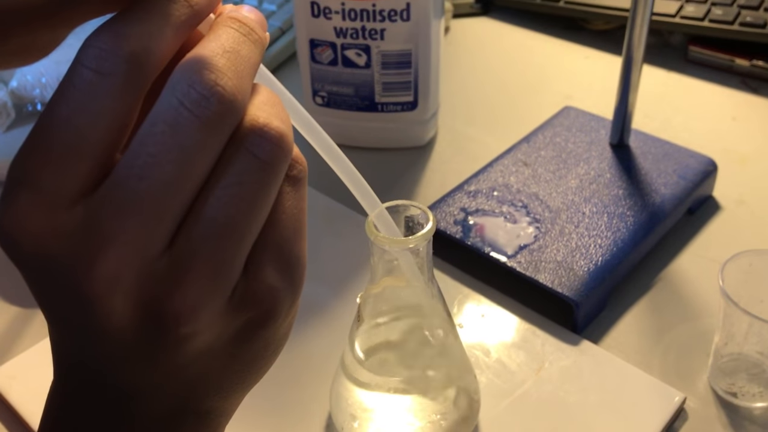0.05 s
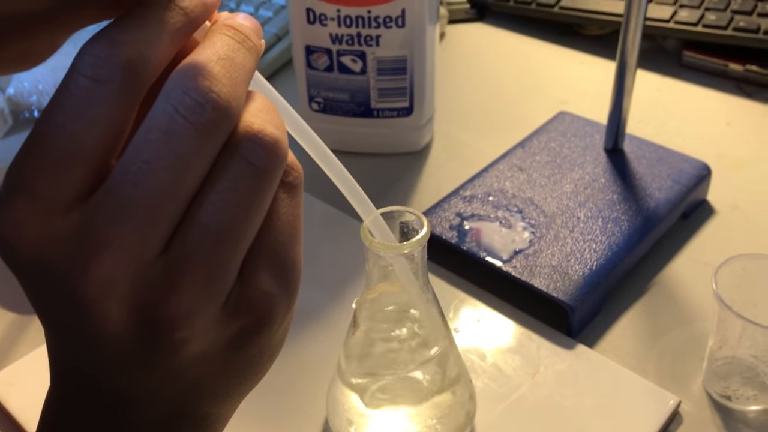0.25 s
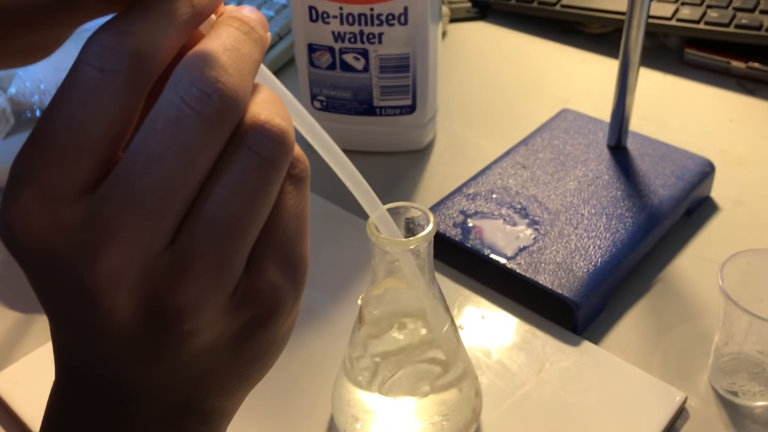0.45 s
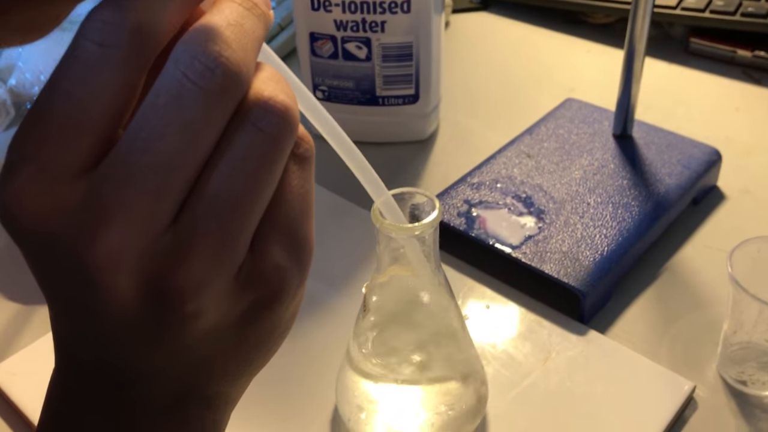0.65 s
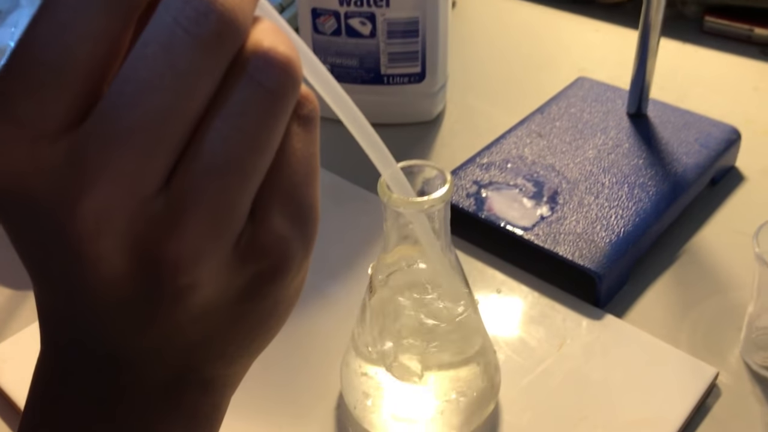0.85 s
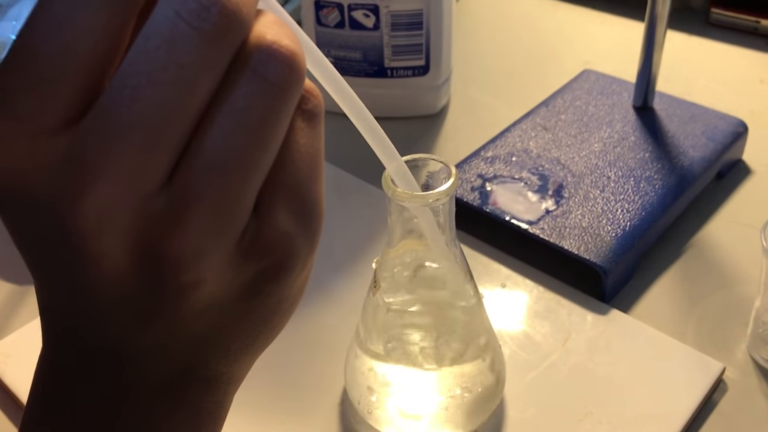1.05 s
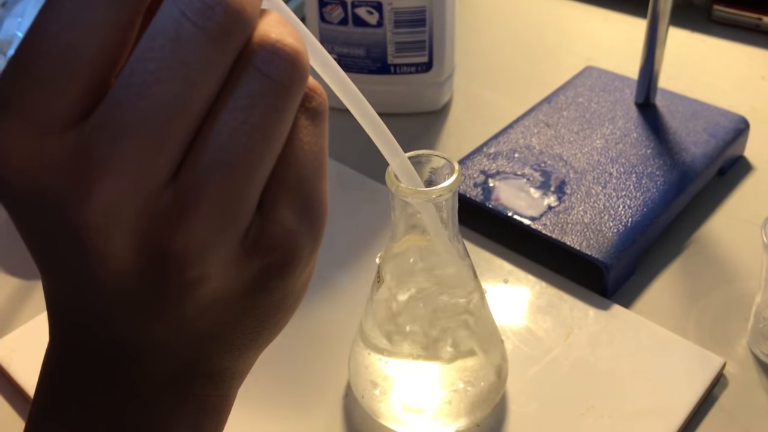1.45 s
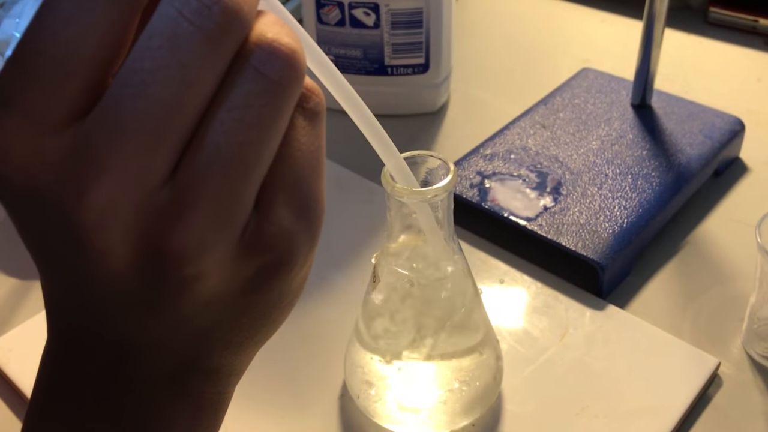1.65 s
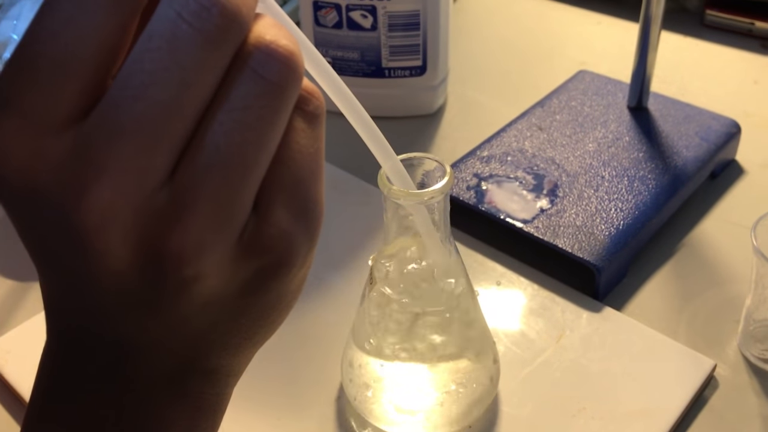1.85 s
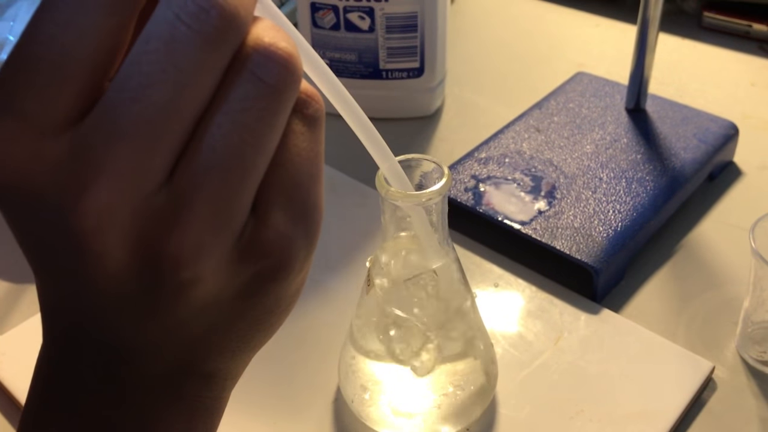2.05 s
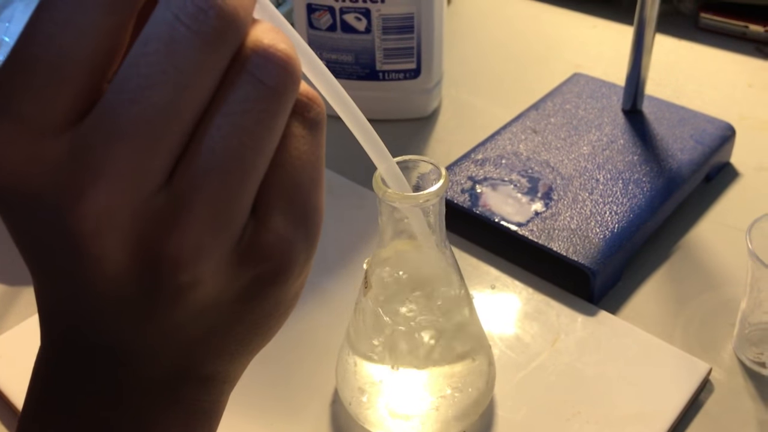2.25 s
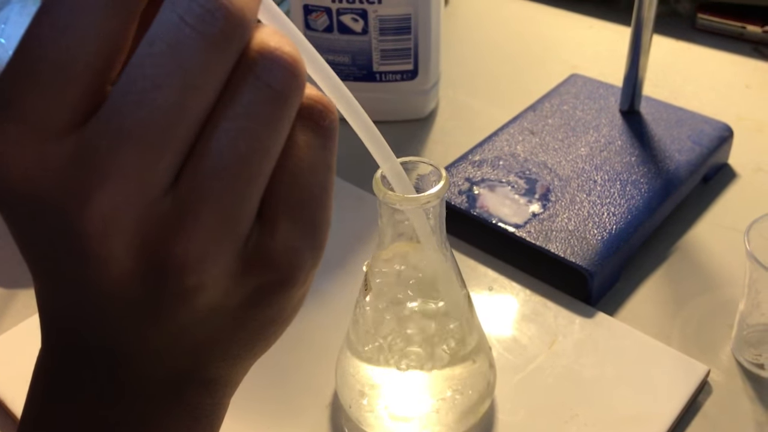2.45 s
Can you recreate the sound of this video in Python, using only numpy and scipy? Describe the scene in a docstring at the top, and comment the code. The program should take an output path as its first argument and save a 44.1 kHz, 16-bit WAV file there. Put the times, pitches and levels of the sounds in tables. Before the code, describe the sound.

Bubbles gurgling irregularly as gas is blown through a tube into liquid in a flask.

```python
"""Gas bubbling in a flask

Gas is blown through a tube into liquid in a glass flask: a short burst, a pause, a longer gurgle.
Each bubble rings as it leaves the tube, most with rising pitch, and knocks the air in the flask.
Films pop at the surface amid fine fizz. The bench reflects; a small room with a low hum answers."""
import sys
import numpy as np
from scipy import signal
from scipy.fft import rfft, irfft
from scipy.io import wavfile

SR = 44100
rng = np.random.default_rng(int(sys.argv[2]) if len(sys.argv) > 2 else 0)


def generate_wav(sig):
    """Save sig (samples, or channels by samples) to the path in sys.argv[1] as 16-bit PCM at SR."""
    pcm = np.round(np.clip(np.atleast_2d(sig).T, -1, 1) * 32767).astype(np.int16)
    wavfile.write(sys.argv[1], SR, pcm)


N = 114660

# room air spectrum (frequency [Hz], relative density [dB])
AIR_SPECTRUM = [(25,-18),(45,-7.5),(125,1),(160,-3.5),(210,-3),(350,-0.5),(650,-9),(1100,-18.5),(4800,-21.5),(7000,-30.5),(14500,-31.5)]
# bubbles leaving the tube (time [s], pitch [Hz], level [dB], ring time [s], relative pitch rise [1/s])
RELEASES = [(.162,660,-40.5,0.011,12.5),(.187,717,-33.5,0.0069,5),(.248,681,-22.5,0.015,15.5),(.254,396.5,-30,0.031,14),
            (.285,965,-40,0.011,14),(.334,510,-29,0.0056,4),(.353,730,-29,0.017,8.5),
            (.718,680,-42,0.029,6.5),(.738,420,-42.5,0.01,22),(.739,222.5,-34.5,0.013,10.5),(0.771,236,-40.5,0.047,28),(0.771,947,-38.5,0.0087,13),(.809,499,-37,0.02,7.5),
            (.834,623,-28.5,0.016,11.5),(.837,398,-32.5,0.025,10),(0.889,436,-29,0.0082,8),(.889,599.5,-32.5,.02,9),(.931,640,-34,0.021,3),
            (.974,619.5,-34.5,0.023,1),(1.000,410,-38,0.014,13),(1.058,550,-34.5,0.0077,-8),(1.086,439,-37.5,0.026,1.5),(1.087,587,-34,0.018,5.5),
            (1.129,691,-31.5,0.011,-1.5),(1.164,734,-36.5,0.005,28),(1.205,635.6,-34,0.019,18.5),(1.228,531,-26.5,0.0095,11),
            (1.327,599.6,-35,0.013,26.5),(1.340,688,-27,0.0052,34),(1.349,553,-32.5,0.008,8),
            (1.402,633,-37.5,0.015,2),(1.403,394,-29,0.0097,13.5),(1.450,562,-35,0.021,24.5),(1.471,617,-31.5,0.012,7.5),(1.48,376,-33,0.02,18.5),
            (1.606,619.4,-32,0.012,14.5),(1.619,730,-37.5,0.0047,4),(1.676,610,-30,0.017,2.5),(1.698,292.5,-37,0.013,28.5),(1.717,410,-43,0.024,12.5),
            (1.777,582,-22.5,0.0052,-6),(1.782,780,-33,0.0051,-10),(1.804,663,-27,0.0056,17),(1.827,465.5,-28,0.016,10.5),
            (1.870,676,-31.5,0.013,29.5),(1.876,525,-22,0.0052,17),(1.931,456,-33.5,0.0084,19.5),(1.939,611,-32,0.018,12.5),(1.956,463,-28,0.0063,18),
            (2.020,637,-31,0.016,6),(2.037,344,-37,0.013,26),(2.050,423,-39.5,0.016,6.5),(2.131,616,-40.5,0.021,2.5),
            (2.218,612,-34.5,0.017,8),(2.242,628,-30.5,0.01,25.5),(2.256,497,-28.5,0.0088,29),(2.268,585,-36.5,0.008,-1),(2.298,528,-32,0.007,14),(2.334,605,-34,0.011,10),
            (2.389,503,-37,0.0072,-8),(2.439,590,-40,0.0074,10),(2.479,720,-38,0.0031,5)]
# modes of the flask and its air (frequency [Hz], level re bubble [dB], T60 [s])
FLASK_MODES = [(277.4,-13.5,0.056),(456.4,-12,0.089),(636,-13,0.09),(1032.3,-20,0.096),(1326,-26.5,0.025),(1739,-31.5,0.049),(2794,-32.5,0.026),(3240,-43.5,0.07),(4098,-34,0.042),(6065,-34,0.015),(8460,-49,0.05)]
# spells of fine spatter (start [s], end [s], base level [dB])
FIZZ_SPELLS = [(0.181,0.44,-65),(0.721,1.009,-64),(1.039,2.386,-71.5)]
# films popping at the surface (time [s], cavity pitch [Hz], ring level [dB], snap level [dB])
FILM_POPS = [(0.201,9500,-33.5,-49),(0.202,12900,-42,-31.5),(.249,4120,-46.5,-54),(0.2595,11700,-47,-40),(.291,3830,-47,-65),(.335,13200,-51,-59),(0.3742,2635,-25.5,-32.5),(0.374,3040,-36.5,-44),(.375,12400,-42.5,-49.5),
             (0.7367,1750,-44,-63),(.772,3490,-57,-45.5),(0.836,7930,-38.5,-45),(0.87,1446,-39.5,-74),(0.8978,4300,-44,-60),(0.926,12600,-67,-56),(.935,2090,-42,-53.5),(0.9788,1680,-57,-47),(0.996,3495,-44.5,-61),(1.1402,4760,-44.5,-47.5),
             (1.259,2484,-44,-46.5),(1.311,7900,-39,-40),(1.4844,1810,-47,-59.5),(1.482,8080,-49,-49.5),(1.6178,3840,-42,-44),(1.619,1790,-37.5,-47),(1.6991,1070,-42,-39),
             (1.804,1980,-47,-53),(1.8427,5720,-32,-60),(1.871,2920,-56,-42),(1.8793,1275,-36,-37),(1.887,10620,-47.5,-52),(1.955,3460,-54,-52),
             (1.9892,8600,-59,-42.5),(2.0383,2690,-35,-34.5),(2.0385,10780,-36.5,-39.5),(2.217,8510,-43.5,-41.5),(2.299,4034,-45.5,-64),(2.3355,9400,-51,-43.5),(2.342,3640,-45,-47)]
# film snap spectrum (frequency [Hz], relative level [dB])
SNAP_SPECTRUM = [(1000,7),(3500,2.5),(6200,3),(7200,-12),(8300,2),(14500,-1.5)]
# bench reflection (delay [s], gain [dB])
BENCH_ECHOES = [(.0062,-13)]
# room tail decay (frequency [Hz], T60 [s])
TAIL_DECAY = [(150,0.78),(800,0.23),(2500,0.17),(12000,0.16)]
# room tail spectrum (frequency [Hz], gain [dB])
TAIL_SPECTRUM = [(150,-2),(600,-10.5),(2500,-8.5),(12000,-15)]

AIR_DB, HUM_HZ, HUM_DB = -59.5, 124.1, -65.5
ATTACK_S, SWELL_SHARE, DAMP_EXPONENT, PINCH_S = 0.00018, 0.11, 1.4, 0.00058
WOBBLE_HZ, WOBBLE_PITCH_SHARE, WOBBLE_DB, SLOSH_SHARE = 90, 0.01, 0.9, 0.012
CAVITY_DECAY_S, SPLASH_DB, SPLASH_OCT = 0.0038, -6, 0.12
FIZZ_PER_S, FIZZ_LAG_S, FIZZ_SPREAD_DB, FIZZ_RARITY_FLOOR = 330, 0.014, 5, np.exp(-3.7)
SNAP_DECAY_S, SNAP_OCT = 0.0027, 0.4
SCATTER_S, SCATTER_DB, POP_COUPLING_DB = 0.0044, -7, -2.5


def amp(db):
    """Decibels to gain."""
    return 10 ** (np.asarray(db) / 20)


def lookup(table, hz):
    """Table value on a log-frequency axis."""
    table_hz, values = np.transpose(table)
    return np.interp(np.log(hz + 1), np.log(table_hz), values)


def add(mix, time_s, sound):
    """Mix a sound in at time_s."""
    part = mix[max(round(time_s * SR), 0):][:len(sound)]
    part += sound[:len(part)]


def noise(shape, size):
    """Unit-rms noise with spectrum shape(hz)."""
    x = irfft(rfft(rng.standard_normal(size)) * shape(np.fft.rfftfreq(size, 1 / SR)), size)
    return x / (x.std() + 1e-12)


def hump(hz, centre_hz, width_oct):
    """Smooth spectral peak."""
    return 1 / (1 + (np.log2((hz + 1) / centre_hz) / width_oct) ** 2)


def high_pass(x, hz):
    """Second-order bass cut."""
    return signal.sosfilt(signal.butter(2, hz, "high", fs=SR, output="sos"), x)


def background():
    """Room air and a steady low hum."""
    air = noise(lambda f: amp(lookup(AIR_SPECTRUM, f)), N)
    hum = np.sqrt(2) * np.sin(2 * np.pi * HUM_HZ * np.arange(N) / SR)
    return amp(AIR_DB) * air + amp(HUM_DB) * hum


def wobble(size):
    """Random quiver of a deforming bubble, unit rms."""
    return noise(lambda f: np.exp(-(f / WOBBLE_HZ) ** 2), size)


def bubbles():
    """Each bubble swells, rings with a gliding pitch and knocks the flask on release."""
    out, t = np.zeros(N), np.arange(SR // 7) / SR
    for time_s, hz, db, ring_s, rise_per_s in RELEASES:
        swell = 1 - np.exp(-t / (ATTACK_S + SWELL_SHARE * ring_s))
        decay = np.exp(-(t / ring_s) ** DAMP_EXPONENT)
        envelope = swell * decay * amp(WOBBLE_DB * wobble(len(t)))
        pitch_hz = hz * (1 + rise_per_s * t + WOBBLE_PITCH_SHARE * wobble(len(t)))
        ring = envelope * np.sin(2 * np.pi * np.cumsum(pitch_hz) / SR)
        knock = flask(t, slosh_ratio=1 + SLOSH_SHARE * rng.standard_normal())
        add(out, time_s, amp(db) * (ring + knock))
    return high_pass(out, hz=214)  # low cut: thins the bass of the bubbles and knocks


def flask(t, slosh_ratio=1):
    """Flask modes after one knock; sloshing liquid shifts their pitch."""
    modes = sum(amp(db - 60 * t / t60_s) * np.sin(2 * np.pi * hz * slosh_ratio * t)
                for hz, db, t60_s in FLASK_MODES)
    return (1 - np.exp(-t / PINCH_S)) * modes


def cavity(hz, t):
    """An opened cavity rings briefly, with splash noise around its pitch."""
    envelope = (1 - np.exp(-t / PINCH_S)) * np.exp(-t / CAVITY_DECAY_S)
    splash = noise(lambda f: hump(f, hz, SPLASH_OCT), len(t))
    return envelope * (np.sin(2 * np.pi * hz * t) + amp(SPLASH_DB) * splash) / np.sqrt(2)


def fizz(low_hz=1400, high_hz=13500):
    """Tiny bubbles burst in clusters just after the large ones."""
    out, t = np.zeros(N), np.arange(SR // 50) / SR
    for start_s, end_s, base_db in FIZZ_SPELLS:
        releases_s = [row[0] for row in RELEASES if start_s <= row[0] < end_s]
        count = int((end_s - start_s) * FIZZ_PER_S)
        for which, wait, pitch, rarity in rng.random((count, 4)):
            time_s = releases_s[int(which * len(releases_s))] - FIZZ_LAG_S * np.log(1 - wait)
            db = base_db - FIZZ_SPREAD_DB * np.log(rarity + FIZZ_RARITY_FLOOR)  # few are loud
            hz = low_hz * (high_hz / low_hz) ** pitch
            add(out, time_s, amp(db) * cavity(hz, t))
    return out


def snap(cavity_hz, t):
    """A film breaks with a noise burst, brighter over a small cavity."""
    burst = noise(lambda f: amp(lookup(SNAP_SPECTRUM, f)) * hump(f, cavity_hz, SNAP_OCT), len(t))
    return burst * (1 - np.exp(-t / PINCH_S)) * np.exp(-t / SNAP_DECAY_S)


def pops():
    """Cavities ring; snaps and fizz scatter off the glass; all stir the flask's upper modes."""
    rings, crackle, t = np.zeros(N), fizz(), np.arange(SR // 10) / SR
    for time_s, hz, ring_db, snap_db in FILM_POPS:
        add(rings, time_s, amp(ring_db) * cavity(hz, t))
        add(crackle, time_s, amp(snap_db) * snap(hz, t))
    walls = rng.standard_normal(len(t)) * np.sqrt(t) * np.exp(-t / SCATTER_S)
    scattered = signal.fftconvolve(crackle, walls / np.linalg.norm(walls))[:N]
    surface = rings + crackle + amp(SCATTER_DB) * scattered
    upper_modes = signal.fftconvolve(high_pass(surface, hz=4000), flask(t))[:N]
    return surface + amp(POP_COUPLING_DB) * upper_modes


def room(direct, predelay_s=0.005):
    """Direct sound, bench reflection and a short diffuse tail."""
    out = direct.copy()
    for delay_s, db in BENCH_ECHOES:
        add(out, delay_s, amp(db) * direct)
    hz, t, spectra = signal.stft(rng.standard_normal(SR // 2), SR, nperseg=256)
    t60_s = lookup(TAIL_DECAY, hz)[:, None]
    envelope = amp(lookup(TAIL_SPECTRUM, hz)[:, None] - 60 * t / t60_s)
    energy_norm = np.sqrt(2 * np.log(1000) / (t60_s * SR))
    _, tail = signal.istft(spectra * envelope * energy_norm, SR, nperseg=256)
    add(out, predelay_s, signal.fftconvolve(direct, tail))
    return out


def scene():
    """The flask in its room, mono."""
    return (background() + room(bubbles() + pops()))[None]


def record(dry, cutoff_hz=14350):
    """Steep treble cut."""
    low_pass = signal.firwin(301, cutoff_hz, window=("kaiser", 8), fs=SR)
    return signal.oaconvolve(dry, low_pass[None], "same")


dry = scene()
out = record(dry)
generate_wav(out)
```